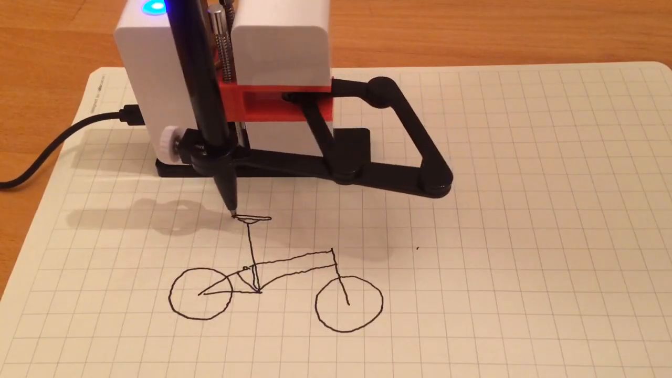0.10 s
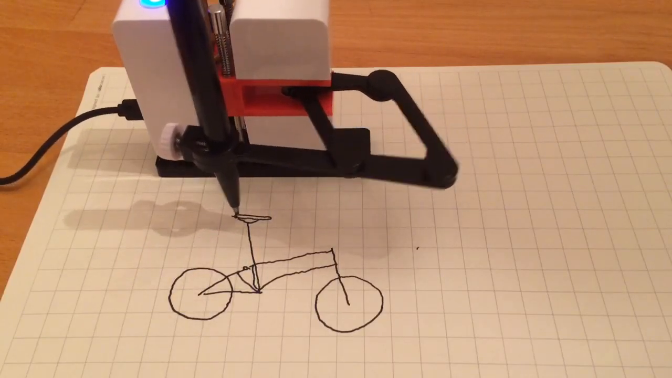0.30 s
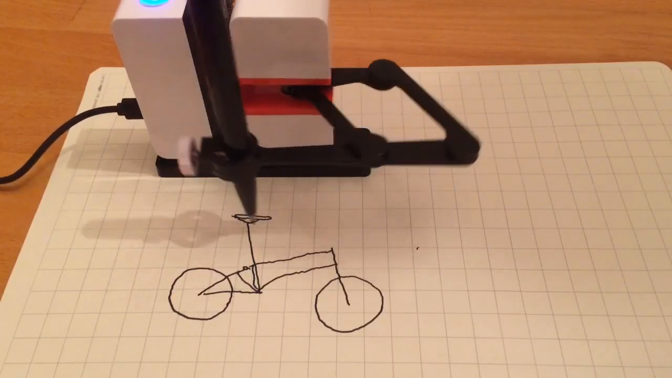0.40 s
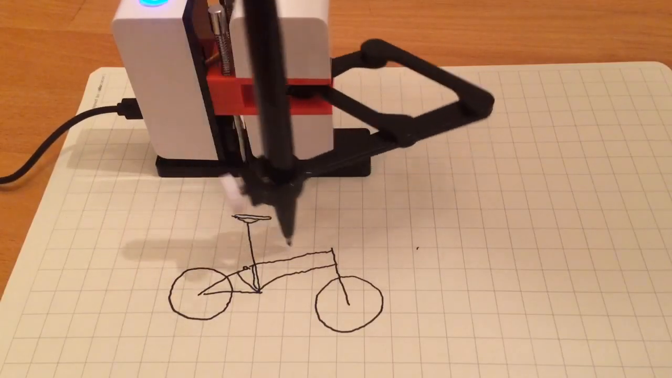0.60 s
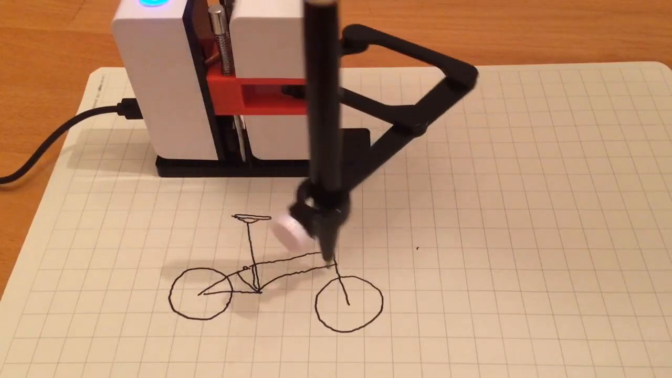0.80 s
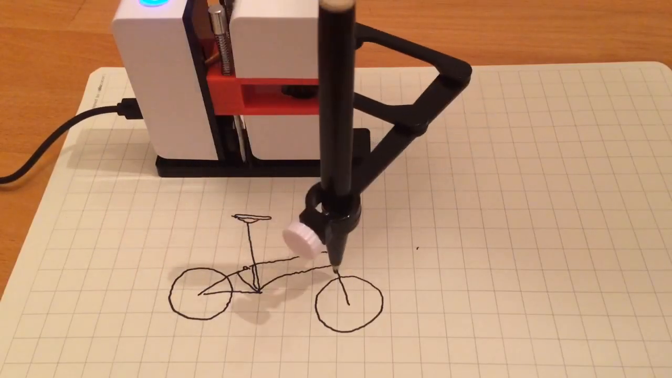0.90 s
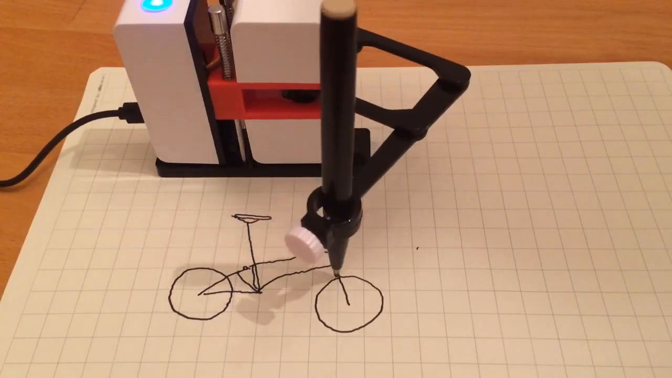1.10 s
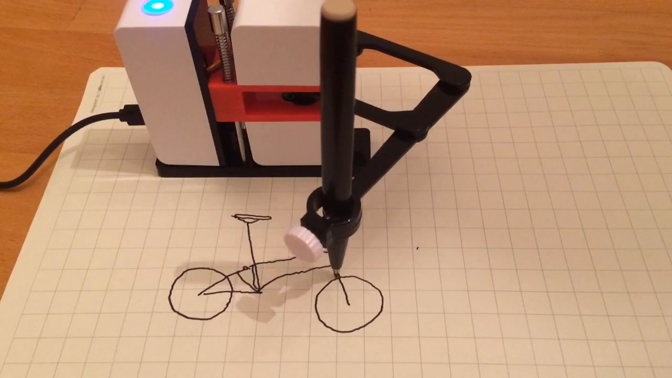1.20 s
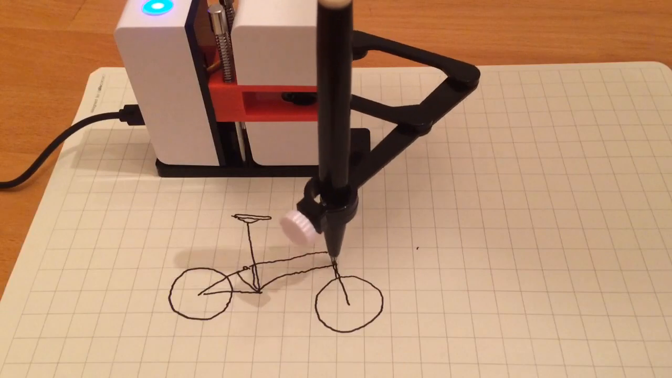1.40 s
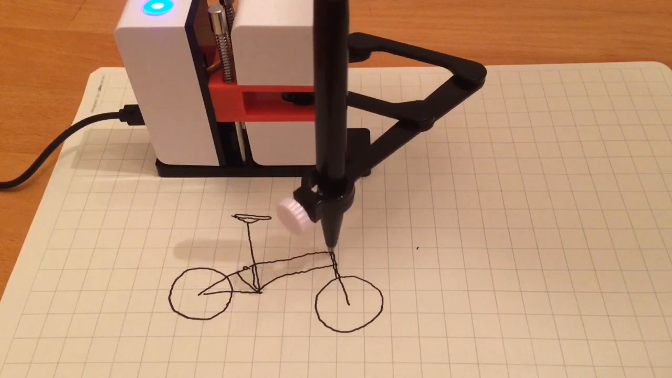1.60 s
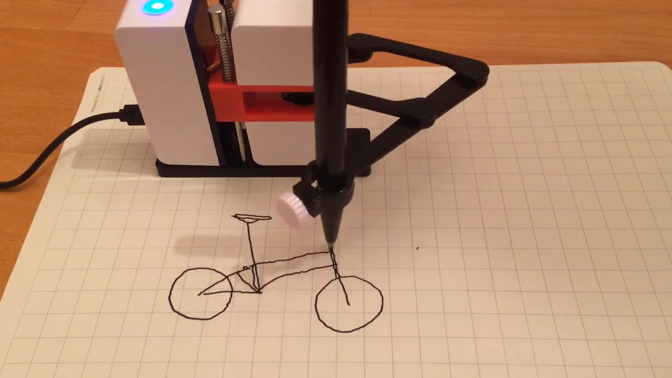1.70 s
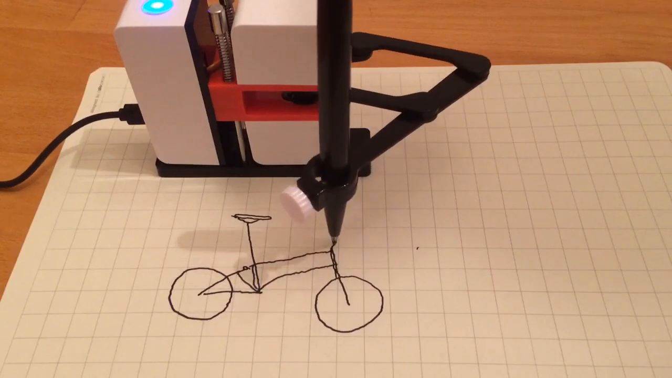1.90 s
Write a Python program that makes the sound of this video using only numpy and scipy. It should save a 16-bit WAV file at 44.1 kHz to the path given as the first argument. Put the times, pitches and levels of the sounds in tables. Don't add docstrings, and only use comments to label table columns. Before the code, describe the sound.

Small servo motors of a desktop drawing arm: faint gear clicks, a short whine lifting the pen, a raspy geared swing, a second whine ending in a knock, then soft rapid ticking; close microphone, quiet room.

```python
import sys
import numpy as np
from scipy import signal
from scipy.fft import rfft, irfft
from scipy.io import wavfile

SR = 44100
rng = np.random.default_rng(int(sys.argv[2]) if len(sys.argv) > 2 else 0)


def store_pcm(level_fs):
    pcm = np.round(np.clip(level_fs, -1, 1) * 32767).astype(np.int16)
    wavfile.write(sys.argv[1], SR, np.atleast_2d(pcm).T)


def undo_db(level):
    steps = np.asarray(level, float) / 20
    return 10 ** steps


N = 83790


def rms_one(x):
    return x / np.sqrt(np.mean(x ** 2) + 1e-20)


def noise():
    return rng.standard_normal(N)


def in_time(rows, column):
    rows = np.array(rows)
    return np.interp(np.arange(N) / SR, rows[:, 0], rows[:, column])


def phase(rate_hz):
    return 2 * np.pi * np.cumsum(rate_hz) / SR


def running(rows):
    t = np.arange(N) / SR
    fade_s = 0.0026
    rise = t - rows[0][0] + fade_s
    fall = rows[-1][0] + fade_s - t
    return np.clip(np.minimum(rise, fall) / fade_s, 0, 1)


def drift(rate_hz):
    r = np.exp(-2 * np.pi * rate_hz / SR)
    slow = signal.lfilter([1], [1, -2 * r, r * r], rng.standard_normal(N + SR))
    return rms_one(slow[SR:])


def resonance(hz, centre, width, db):
    return 1 + (undo_db(db) - 1) / (1 + 2j * (hz - centre) / width)


def body(x, tone, peaks=()):
    hz = np.maximum(np.fft.rfftfreq(N, 1 / SR), 1)
    points = np.array(tone)
    colour_db = np.interp(np.log(hz), np.log(points[:, 0]), points[:, 1])
    lows = np.minimum(hz / points[0, 0], 1) ** 2
    highs = np.minimum(points[-1, 0] / hz, 1) ** 4
    response = undo_db(colour_db) * lows * highs + 0j
    for centre, width, db in peaks:
        response *= resonance(hz, centre, width, db)
    return rms_one(irfft(rfft(x) * response, N))


def patchy(x, patchy_db):
    hz = np.maximum(np.fft.rfftfreq(N, 1 / SR), 1)
    spectrum = rfft(x)
    place = np.clip(2 * np.log2(hz / 700), 0, 9)
    total = np.zeros(N)
    for k in range(10):
        band = irfft(spectrum * np.maximum(1 - abs(place - k), 0), N)
        total += undo_db(patchy_db * drift(20)) * band
    return rms_one(total)


def teeth(per_s, spread_db, hiss):
    born = rng.random(N) < per_s / SR
    strength = undo_db(spread_db * noise())
    scratch = signal.lfilter([1], [1, -.97], born * strength)
    return noise() * (rms_one(scratch) + hiss)


def envelope(rows):
    t = np.arange(N) / SR
    total = np.zeros(N)
    for start, db, length in rows:
        rise = np.clip((t - start) / (0.46 * length), 0, 1)
        total += undo_db(db) * rise * np.exp(-np.maximum(t - start, 0) / length)
    return total


def bursts(rows, tone, peaks=()):
    return envelope(rows) * body(noise(), tone, peaks)


def partials(orders, turn, waver_db):
    total = np.zeros(N)
    for multiple, db in orders:
        start = rng.uniform(0, 2 * np.pi)
        total += undo_db(db + waver_db * drift(70.)) * np.sin(multiple * turn + start)
    return total


# pitch_hz, width_hz, level_db
PEN_HOUSING = [(1570, 86, 7.8), (3400, 1200, 6.1), (5690, 110, 9.7), (6970, 880, 5), (13600, 3700, 4.85)]


def pen_servo(rows, orders, mesh, tone, beat, waver_db, hum_db):
    turn = phase(in_time(rows, column=1) * (1 + .0008 * drift(50.)))
    whine_db = in_time(rows, column=3)
    whine = partials(orders, turn, waver_db)
    whistle = partials(mesh, turn, waver_db)
    grip = undo_db(np.minimum(0.38 * (whine_db + 30.6), 0))
    braking = np.clip((rows[-1][0] - np.arange(N) / SR - .02) / .05, 0, 1)
    scratching = teeth(1400.0, 1.5, 4.0) * (1 + beat * np.cos(turn))
    gears = patchy(body(scratching, tone, PEN_HOUSING), patchy_db=0.9)
    gears = gears + np.sqrt(grip) * braking * whistle
    gears = gears + grip * undo_db(hum_db + 2.8 * drift(36.0)) * np.sin(turn)
    gear_level = undo_db(in_time(rows, column=2) + 0.5 * drift(20.0))
    return running(rows) * (undo_db(whine_db) * whine + gear_level * gears)


# start_s, pitch_hz (commutator rate), gear_level_db, whine_level_db
LIFT = [
    (.205, 300, -52.5, -63),
    (.228, 403, -42.5, -70),
    (.256, 483.3, -40, -37),
    (.292, 505.8, -39.5, -36.5),
    (.352, 516, -40.5, -31),
    (.372, 513, -38, -39.5),
    (.39, 516.6, -39.5, -33.5),
    (.428, 474, -38, -37),
    (.455, 435, -39, -53),
]
# multiple of the commutator rate, level_db
LIFT_WHINE = [(2, -15.5), (3, -8), (5, -23), (6, -20.5), (7, -23.5)]
# multiple of the commutator rate, level_db over the gear noise
LIFT_WHISTLES = [(9, -12), (15, -15), (27, -8)]
# pitch_hz, level_db
LIFT_TONE = [(250, -23), (900, -19.5), (1400, -8.5), (1900, -15), (3000, -11), (4500, -13), (7000, -5),
             (15800, -6)]


def pen_lift():
    return pen_servo(LIFT, LIFT_WHINE, LIFT_WHISTLES, LIFT_TONE, beat=0.25, waver_db=2.5, hum_db=-19.5)


# start_s, pitch_hz (commutator rate), gear_level_db, whine_level_db
LOWER = [
    (1.045, 300, -67, -74),
    (1.06, 384.3, -45.5, -61),
    (1.076, 434, -44, -43),
    (1.098, 510.8, -43.5, -38),
    (1.136, 536.8, -44.5, -31),
    (1.24, 532.2, -42.5, -32.5),
    (1.26, 510.5, -44.5, -35.5),
    (1.277, 480, -45, -70),
    (1.302, 404, -61, -64),
]
# multiple of the commutator rate, level_db
LOWER_WHINE = [(2, -37.5), (3, -14), (5, -17), (6, -21.5), (7, -27), (8, -31), (9, -25.5), (12, -25)]
# multiple of the commutator rate, level_db over the gear noise
LOWER_WHISTLES = [(10, -22)]
# pitch_hz, level_db
LOWER_TONE = [(250, -20), (900, -16.5), (1400, -18), (1900, -31), (2700, -11), (4500, -18.5), (5900, -8.5),
              (15800, -10.5)]


def pen_lower():
    return pen_servo(LOWER, LOWER_WHINE, LOWER_WHISTLES, LOWER_TONE, beat=0.34, waver_db=1.6, hum_db=-15.0)


# start_s, effort_db, mesh_pitch_hz, mesh_level_db
SWING = [(.44, -44, 2800, -60), (.55, -42, 2800, -58), (.58, -43.5, 2650, -45.5), (.63, -44, 2912, -59),
         (.685, -40.5, 2800, -58.5), (.76, -43, 2700, -60), (.835, -45, 2461, -49),
         (.92, -45.5, 2700, -61.5), (.95, -48.5, 2700, -56.5), (.962, -60.5, 2700, -61.5),
         (1.04, -83, 2700, -74)]
# start_s, pitch_hz, level_db
SWING_SPEED = [(.46, 616, -70), (.47, 614.5, -60), (.555, 613, -70), (.59, 560, -67), (.63, 609, -66),
               (.675, 631, -68), (.7, 597, -80), (.742, 654, -64.5), (.785, 564, -66.5), (.82, 567, -70),
               (.85, 579, -83), (.885, 571, -67), (.925, 564, -65), (.95, 577, -84)]
# pitch_hz, level_db
SWING_TONE = [(250, -42), (1000, -18.5), (2000, -13.5), (3500, -5), (6000, -13.5), (9000, -5),
              (12000, -7.5), (15800, -2.5)]
# pitch_hz, width_hz, level_db
ARM_BODY = [(1535, 85, 20.7), (2800, 450, 11.4), (4950, 180, 11.7), (6040, 700, 15), (7110, 200, 8),
            (8730, 1260, 12), (12420, 1360, 7.9), (14400, 450, 7.7)]


def swing():
    effort = undo_db(in_time(SWING, column=1))
    rattle = patchy(body(teeth(1400.0, 2.1, 3.4), SWING_TONE, ARM_BODY), patchy_db=1.5)
    rattle = undo_db(1.5 + 0.48 * drift(14.0)) * rattle
    hum_turn = phase(in_time(SWING_SPEED, column=1) * (1 + 0.019 * drift(41.0)))
    hum = undo_db(in_time(SWING_SPEED, column=2) + 2.5 * drift(56.0)) * np.sin(hum_turn)
    mesh_turn = phase(in_time(SWING, column=2))
    mesh = rms_one(drift(106.0) * np.sin(mesh_turn) + drift(140.0) * np.cos(mesh_turn))
    mesh = undo_db(in_time(SWING, column=3)) * mesh
    return running(SWING) * (effort * rattle + running(SWING_SPEED) * hum + mesh)


# start_s, effort_db
CREEP = [
    (0, -69.5),
    (.14, -70.5),
    (.19, -54.5),
    (.21, -68),
    (.95, -62),
    (1.0, -62),
    (1.05, -61.5),
    (1.3, -59),
    (1.85, -63.5),
    (1.9, -63),
]
# start_s, level_db
PUSHES = [(0.168, -51.5), (1.335, -53), (1.367, -56.5), (1.412, -55), (1.439, -52), (1.487, -53),
          (1.51, -51), (1.539, -51), (1.586, -55), (1.626, -52.5), (1.642, -66), (1.677, -51), (1.7, -54),
          (1.735, -48.5), (1.76, -55), (1.797, -52.5), (1.833, -55)]
# pitch_hz, level_db
CREEP_TONE = [(900, -4.5), (1400, -19), (2000, -8), (3000, -2), (4400, -15.5), (6000, -4.5), (10000, -11),
              (15800, -12)]
# pitch_hz, width_hz, level_db
CREEP_BODY = [(2700, 95, 2.3), (3450, 195, 9), (3983, 100, 16.4), (4936, 220, 14.9), (5940, 450, 5.7),
              (7750, 1300, 8.8)]


def creep():
    t = np.arange(N) / SR
    steps_per_s, push_s = 140, 0.0089
    step = phase(steps_per_s * (1 + 0.119 * drift(20.5)))
    ticks = noise() * undo_db(3.3 * np.cos(step))
    level = undo_db(in_time(CREEP, column=1))
    for start, db in PUSHES:
        level = level + undo_db(db - 6.5) * np.exp(-((t - start - push_s) / push_s) ** 2)
    return level * patchy(body(ticks, CREEP_TONE, CREEP_BODY), patchy_db=0.0)


# start_s, level_db
TICKS = [(.0085, -42), (0.0176, -45.5), (0.031, -42.5), (.054, -47), (0.09, -49), (0.1037, -46.5),
         (0.1064, -44), (0.117, -45.5), (.1215, -46), (0.126, -50), (.133, -51), (.139, -48), (0.145, -46),
         (0.156, -53), (.162, -49), (.172, -46), (.181, -38), (0.195, -60)]
# start_s, level_db
SNAGS = [
    (.5527, -39),
    (.594, -38),
    (.7185, -34),
    (.7235, -38),
    (.754, -38),
    (.7702, -35),
    (.9045, -39),
    (.9215, -39),
]
# pitch_hz, level_db
TICK_TONE = [(2000, -19), (5000, -6.5), (6500, -11.5), (8300, 1), (10000, -20), (15800, -14)]


def catching_teeth():
    ticks = bursts([(start, db, .0012) for start, db in TICKS], TICK_TONE)
    snags = bursts([(start, db, .0008) for start, db in SNAGS], TICK_TONE)
    return ticks + snags


# start_s, level_db
NUDGES = [
    (0.02, -48.5),
    (0.036, -50),
    (0.048, -52),
    (0.059, -51),
    (0.084, -54),
    (.145, -50.5),
    (.194, -56),
]
# pitch_hz, level_db
NUDGE_TONE = [(1500, -46), (2800, -3), (3800, -6.5), (5000, -15), (15800, -39)]


def nudges():
    return bursts([(start, db, .004) for start, db in NUDGES], NUDGE_TONE)


# start_s, level_db, length_s
KNOCKS = [
    (.218, -40.5, 0.016),
    (.41, -38, 0.037),
    (.443, -36, 0.003),
    (1.05, -46, 0.022),
    (1.265, -35, 0.0069),
    (1.286, -41.5, 0.0072),
]
# start_s, level_db, length_s
LINGER = [
    (1.29, -53.5, 0.072),
]
# pitch_hz, level_db
KNOCK_TONE = [(400, -31), (1500, 8.5), (2100, -4), (3100, 12), (4200, -5.5), (15800, -18)]
# pitch_hz, width_hz, level_db
LINGER_BODY = [(1600, 45, 14.3), (2650, 55, 21)]


def pen_knocks():
    return bursts(KNOCKS, KNOCK_TONE) + bursts(LINGER, KNOCK_TONE, LINGER_BODY)


# start_s, level_db, length_s, pitch_hz
JOLTS = [
    (0.271, -44.5, 0.059, 93.9),
    (.315, -45.5, 0.023, 92.4),
    (.83, -53.5, 0.047, 89.9),
    (1.135, -47, 0.061, 85),
    (1.254, -41.5, 0.016, 88.5),
    (1.366, -46, 0.034, 83),
    (1.721, -53.5, .04, 94.5),
]


def jolts():
    t = np.arange(N) / SR
    total = np.zeros(N)
    for start, db, length, hz in JOLTS:
        total += envelope([(start, db, length)]) * np.sin(2 * np.pi * hz * (t - start))
    return total


# start_s, level_db
DESK = [(0, -71.5), (.2, -64.5), (.33, -50), (.38, -56.5), (.62, -63), (.75, -67.5), (.86, -59.5),
        (1.02, -64.5), (1.16, -54.5), (1.23, -62), (1.27, -52.5), (1.32, -64), (1.4, -60.5), (1.47, -73),
        (1.73, -69), (1.9, -64.5)]
# pitch_hz, level_db
DESK_TONE = [(20, -23), (40, -10.5), (95, 2.5), (150, -6.5), (220, -21), (330, -20.5)]


def desk_hum():
    peaks = [(132.2, 6.8, 4.2), (191.0, 29, 11.1)]  # pitch_hz, width_hz, level_db
    return undo_db(in_time(DESK, column=1)) * body(noise(), DESK_TONE, peaks)


# pitch_hz, level_db
ROOM_TONE = [(150, -4), (300, -12.5), (700, -7), (1200, -15), (2000, -7.5), (15800, -26.5)]


def room():
    return undo_db(-66.5) * body(noise(), ROOM_TONE)


def scene():
    pen = pen_lift() + pen_lower() + pen_knocks()
    arm = swing() + creep() + catching_teeth() + nudges()
    mono = pen + arm + jolts() + desk_hum() + room()
    return np.array([mono, mono])


def roll_off(x):
    return signal.sosfilt(signal.butter(12, 15890, fs=SR, output="sos"), x)


# pitch_hz, width_hz, level_db
NOTCHES = [(5310, 67, -5.5), (6700, 160, -5), (8190, 170, -10), (10020, 240, -8), (11660, 120, -5.5),
           (13170, 210, -11), (14950, 130, -1)]
# start_s, share (0 to 1)
NARROW = [
    (.47, 0),
    (.5, 1),
    (1.02, 1),
    (1.04, 0),
    (1.76, 0),
    (1.8, 1),
]


def record(dry):
    hz = np.fft.rfftfreq(N, 1 / SR)
    spectrum = rfft(dry)
    for centre, width, db in NOTCHES:
        spectrum = spectrum * resonance(hz, centre, width, db)
    heard = irfft(spectrum, N)

    def cut_above(cutoff_hz):
        return signal.sosfiltfilt(signal.ellip(8, .3, 40, cutoff_hz, fs=SR, output="sos"), heard)

    wide = cut_above(15850)
    narrow = cut_above(15150)
    return roll_off(wide + in_time(NARROW, column=1) * (narrow - wide))


dry = scene()
out = record(dry)
store_pcm(out)
```